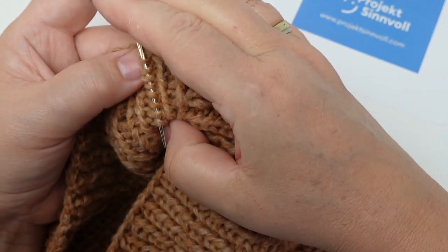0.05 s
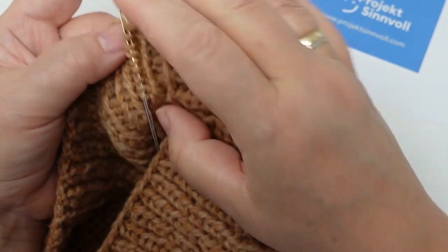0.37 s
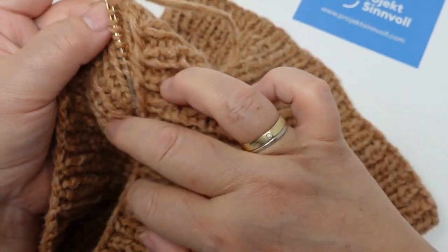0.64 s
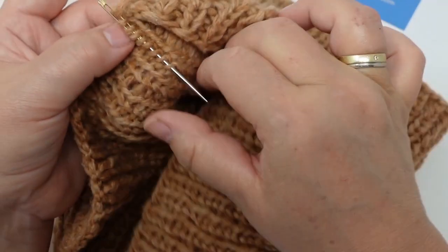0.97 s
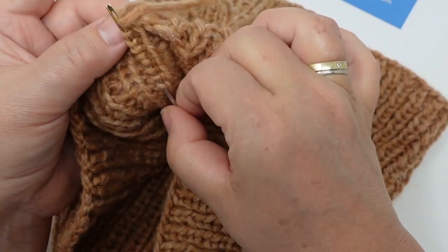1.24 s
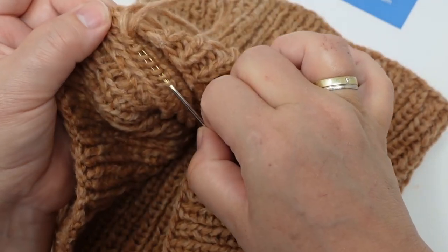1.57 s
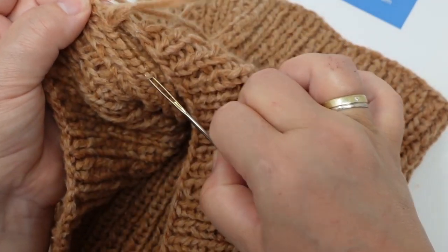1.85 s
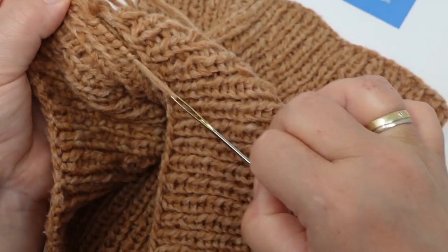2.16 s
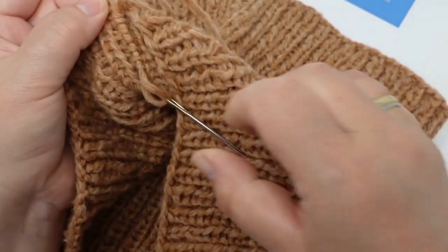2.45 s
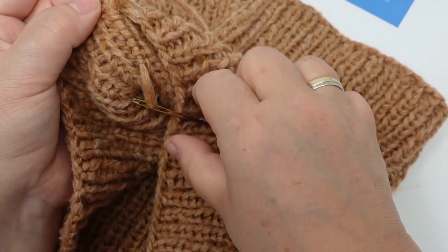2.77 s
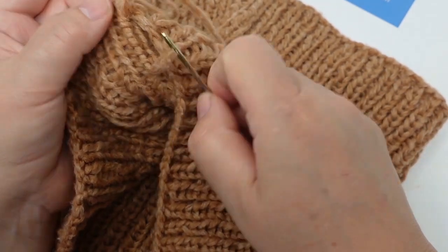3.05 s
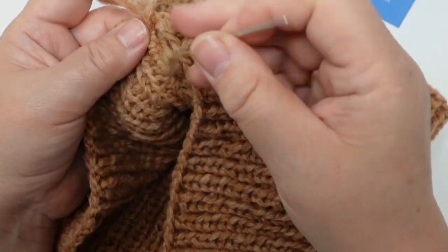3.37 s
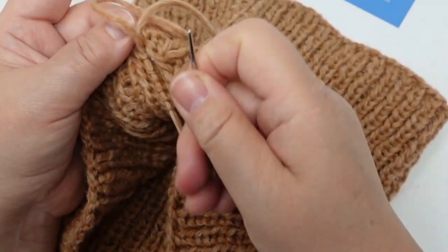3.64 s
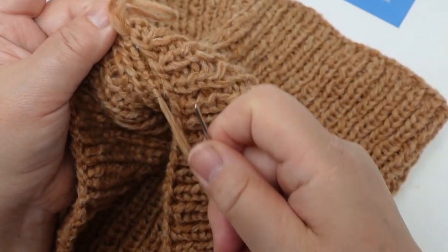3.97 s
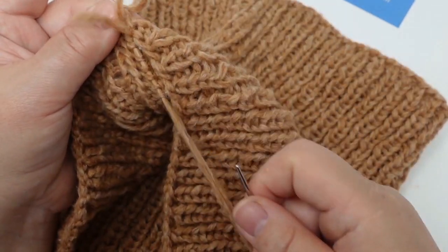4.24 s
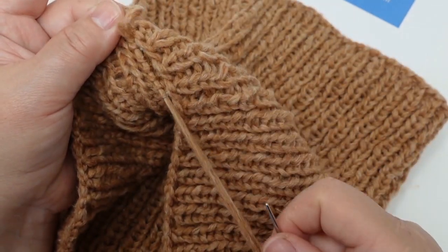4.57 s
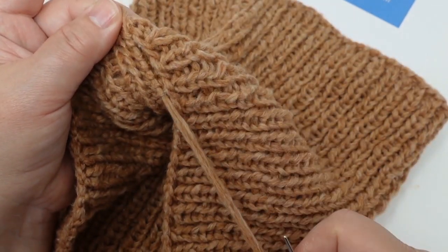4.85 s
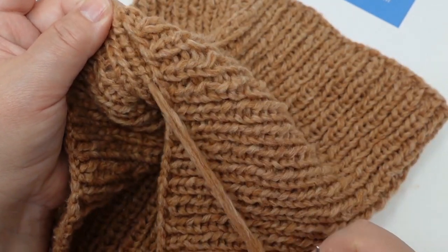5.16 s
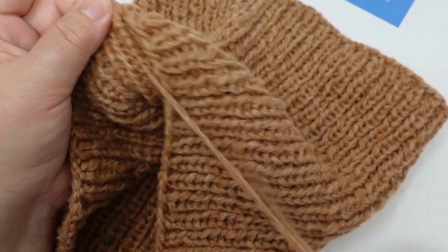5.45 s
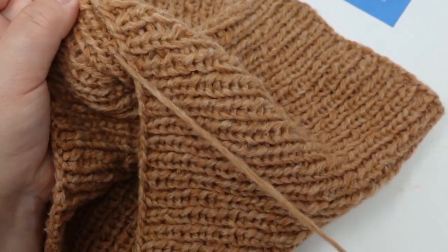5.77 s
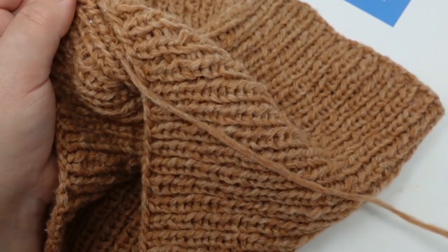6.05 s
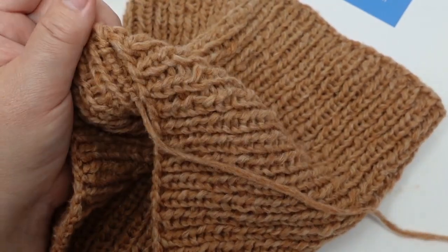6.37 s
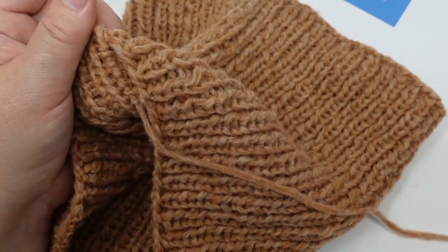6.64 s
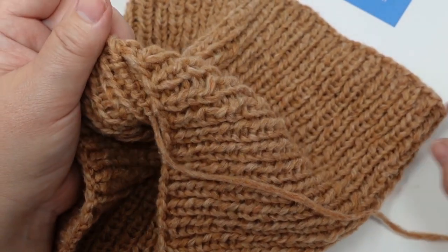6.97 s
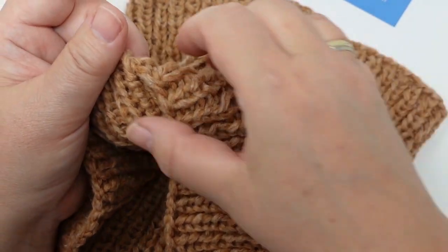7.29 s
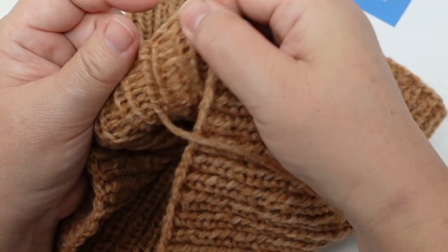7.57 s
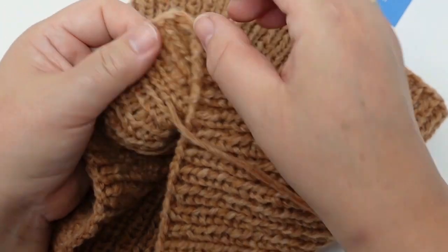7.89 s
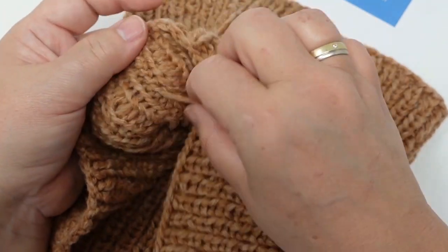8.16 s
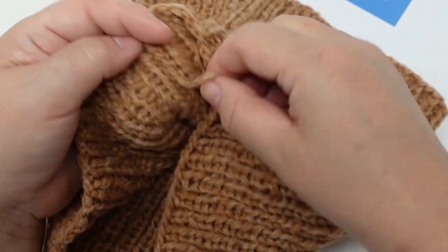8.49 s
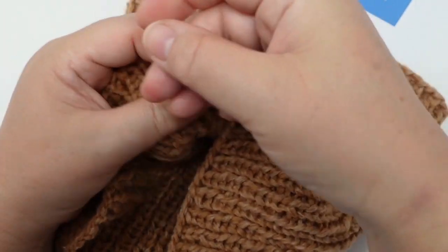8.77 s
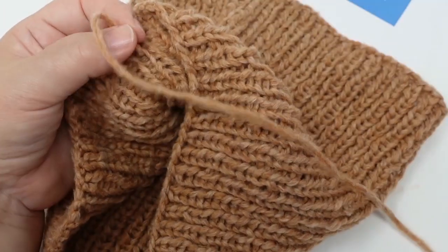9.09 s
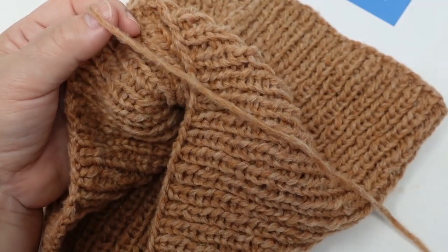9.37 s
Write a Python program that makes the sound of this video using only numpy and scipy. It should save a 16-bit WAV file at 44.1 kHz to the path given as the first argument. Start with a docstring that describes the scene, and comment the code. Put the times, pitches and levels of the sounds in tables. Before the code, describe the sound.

Wool is darned by hand, heard close in a small quiet room with a faint steady hiss. For the first 2.5 seconds fingers rub the knit in soft scratchy strokes, with very faint low gurgling blips around 0.5 to 1 second. The table clacks dryly at 1 second and louder at 2.5, followed by a small needle tick. From 3.6 to 5 seconds yarn is drawn through with a soft, fibrous hiss that dulls and fades. Two barely audible high squeaks come at 2 and 4.4 seconds. Around 6.4 a hand sweeps over the tabletop with light bumps, and the needle is set down with a sharp knock at 6.8. Rubbing resumes, with a clack at 7.3 and a weaker one at 8.8. At 9.2 the hand brushes and thumps the table, the loudest moment, followed by a few softer bumps until 9.6.

```python
"""Wool being darned by hand, close up: fingers rub the stitches and the yarn hisses as it is drawn
through, countless fibres slipping and snapping free, with small needle ticks. Now and then the joints
of the table underneath slip with a dry clack. The hand slides on the top, lays the needle down, and
later thumps softly to pick it up again. The room is small and quiet; early on come faint low gurgling
blips and a soft rough tone, then two thin high squeaks."""
import sys
import numpy as np
from scipy import signal
from scipy.fft import rfft, irfft, next_fast_len
from scipy.io import wavfile
from scipy.ndimage import uniform_filter1d

SR = 44100
rng = np.random.default_rng(int(sys.argv[2]) if len(sys.argv) > 2 else 0)


def wrap_up_sound(samples):
    """Save the sound to the file named by the first command line argument, as 16-bit audio."""
    columns = np.atleast_2d(samples).T
    # keep every value between -1 and 1, then stretch to whole-number steps
    tamed = np.clip(columns, -1, 1)
    steps = np.round(tamed * 32767).astype(np.int16)
    wavfile.write(sys.argv[1], SR, steps)


N = 424241

# blows on the table top: t/s, flesh thud/dB, nail or needle knock/dB, shudder of the whole top/dB
TABLE_BLOWS = [(6.362, -44.5, -66, -62), (6.396, -46, -51, -62), (6.457, -37, -47.5, -60),
               (6.478, -39, -49, -46), (6.51, -37, -71, -56), (6.528, -39, -71, -60),
               (6.658, -43, -47.5, -48), (6.8236, -48, -23, -35), (9.189, -27, -49, -40.5),
               (9.239, -18, -27, -23.5), (9.365, -25.5, -35.5, -36.5), (9.462, -37.5, -52.5, -46.5),
               (9.527, -28.5, -47, -42), (9.596, -43, -62, -65)]
# stereo image of the rubbing and of the hits: f/Hz, left-right likeness
RUB_IMAGE = [(200, 1), (1500, 0.48), (6000, 0.67), (14000, 0.79)]
HIT_IMAGE = [(200, 0.52), (2000, 0.53), (12000, 0.8)]


def wool():
    """Fibres drag through the stitches under grip, strokes and drawn yarn; quick moves are brighter."""
    # the knit shifting in the holding hand: t/s, level/dB
    grip = [(.2, -103), (.35, -71.5), (1.65, -65), (2.3, -64.5), (2.45, -75), (2.9, -78.5), (3.55, -69),
            (5.05, -88), (6.3, -77.5), (6.9, -75), (7.25, -76.5), (7.6, -68.5), (8.2, -73), (8.4, -65.5),
            (8.8, -70.5), (9.6, -69)]
    # the long draw of yarn: t/s, level/dB
    draw = [(3.57, -75), (3.64, -57), (3.73, -52.5), (3.85, -61), (3.92, -55), (4.28, -57), (4.36, -60),
            (4.56, -62.5), (4.77, -58.5), (4.85, -66), (5.02, -77)]
    # finger strokes: t/s, level/dB, half-length/s, treble lift/dB
    strokes = [(.41, -58, 0.065, 2.5), (.53, -60, 0.11, -5), (.68, -55, 0.014, 4), (.76, -61, .05, 0),
               (.85, -53, 0.034, 7.5), (.888, -47.5, 0.018, 7.5), (.97, -51.5, 0.064, 2),
               (1.06, -57.5, 0.079, -9), (1.53, -65, 0.044, -4), (1.78, -58.5, .055, -3),
               (1.99, -59, 0.071, 2.5), (2.12, -54, 0.032, 5.5), (2.27, -65, 0.018, 11),
               (2.36, -58, 0.02, 4), (3.04, -71, 0.035, 7), (3.29, -65.5, 0.025, 7), (3.42, -67, 0.029, 17),
               (5.16, -71.5, .025, 8), (5.45, -64.5, 0.031, -4), (5.56, -67.5, 0.059, -10),
               (5.92, -68, 0.046, -2), (7.5, -58, 0.058, 0.5), (7.8, -61, 0.014, 1), (8.1, -68, 0.085, 1),
               (8.49, -58.5, 0.033, 5), (8.67, -55.5, 0.017, 8.5)]
    # tone of the fibre hiss: f/Hz, level/dB
    spectrum = [(20, -70), (70, -35), (150, -36), (320, -21.5), (700, -9.5), (1200, -0.5), (1800, -2),
                (2600, 0), (4500, 2.5), (6400, 1), (8000, 1.5), (10500, -1.5), (15500, -6.5)]
    # resonances that colour the rubbing: f/Hz, width/Hz, lift/dB
    peaks = [(1870, 90, 6), (4050, 110, 5), (6040, 280, 6.5), (6550, 200, 8), (7270, 150, 3),
             (8300, 450, 2.5), (8880, 150, 3), (10340, 200, 3.5), (10820, 200, 3)]
    hinge_hz, treble_db = 9000, 4.5
    draw_db = curve(draw)
    draw_lift_db = 3.5 + 0.41 * (draw_db - draw_db.max())  # the yarn dulls as it slows
    moves = [(amp(curve(grip)), -2), (amp(draw_db), draw_lift_db)]
    moves += [(swell(s, db, half), lift_db) for s, db, half, lift_db in strokes]
    dull_power, bright_power = np.zeros((2, N))
    for level, lift_db in moves:
        tilt = amp(lift_db) ** 2
        power = 2 * level ** 2 / (1 + tilt)
        dull_power += power
        bright_power += power * tilt

    def resonances(hz):
        return amp(sum(db / (1 + (2 * (hz - centre) / width) ** 2) for centre, width, db in peaks))
    hiss = reflections(coloured(fibres(per_s=260, spread_db=7, snap_db=-9.5), spectrum, RUB_IMAGE))
    hiss = unit(filtered(hiss, resonances))
    treble = filtered(hiss, lambda hz: 1 / (1 + (hinge_hz / (hz + 1)) ** 6))
    rub = np.sqrt(dull_power) * (hiss - treble) + amp(treble_db) * np.sqrt(bright_power) * treble
    flutter = amp(-1.5 + 1.1 * wobble(45))
    return rub * flutter * amp([[.3], [-.3]])


def fibres(per_s, spread_db, snap_db):
    """Countless tiny slips merge into hiss; a few fibres snap free more loudly."""
    snapping = rng.random(N) < per_s / SR
    snaps = snapping * amp(spread_db * np.minimum(rng.exponential(size=N), 3))
    return white() + amp(snap_db) * unit(snaps * np.sign(white()))


def ticks():
    """Needle and snagging fibres tick brightly, one clack gets a sharp edge, and the nail grazes the top before
    each blow."""
    # lone ticks: needle ticks and snags, the sharp edge of the clack at 2.56 s, and the nail grazing the top
    # just before the blow at 6.658 s: t/s, level/dB
    lone_ticks = [(1.938, -55), (2.5642, -43.5), (5.424, -57), (5.452, -58), (6.651, -47), (7.109, -53.5),
                  (7.133, -57), (9.048, -55.5)]
    # tone of a tick: f/Hz, level/dB
    spectrum = [(20, -70), (120, -41), (400, -6.5), (1100, 2.5), (2400, -4), (4800, 4.5), (8000, -4.5),
                (15500, -16.5)]
    level, t = np.zeros(N), clock(SR // 3)
    for s, db in lone_ticks:
        add(level, s, amp(db) * fade(t, hold=0.00077, t60=0.086))
    for s, thud_db, knock_db, _ in TABLE_BLOWS:
        lead_s = .00028 * (-13 - thud_db)  # a softer, slower blow lands longer after the nail
        nail_db = thud_db - 8 + 0.69 * (knock_db - thud_db)
        add(level, s - lead_s, amp(nail_db) * fade(t, hold=0.001, t60=0.059))
    return level * coloured(white(), spectrum, RUB_IMAGE)


def blows():
    """Soft flesh moves the top's low modes, nail and needle its higher ones; knocks add contact noise."""
    # modes of the table top: f/Hz, level/dB, t60/s
    top = np.array([(120, -9, .11), (139, 0, .11), (172, -9, .08), (294, -20.5, .16), (497, -15, .11),
                    (580, -17, .1), (721, -19, .08), (793, -11, .07), (905, -1, .045), (968, 1, .055),
                    (1060, -1, .045), (1130, -4, .045), (1205, -4, .055), (1310, -8, .045),
                    (1470, -10, .045), (1640, -14, .04), (2200, -19, .06)])
    # tone of the shudder and of the hard contact: f/Hz, level/dB
    shudder_spectrum = [(20, -33), (60, -21), (160, -13), (280, 6.5), (420, 3), (580, 0.5), (900, -3.5),
                        (1400, -17.5), (1800, -36), (2200, -27), (3000, -25), (8000, -56)]
    contact_spectrum = [(20, -70), (100, -28), (600, 1), (1200, 5.5), (2400, 2.5), (5000, -5.5), (8000, -7),
                        (11000, -12.5), (15500, -32)]
    (modes, shudder, contact), t = np.zeros((3, N)), clock(SR // 3)
    low = top[:, 0] < 350
    for s, thud_db, knock_db, shudder_db in TABLE_BLOWS:
        thud = leveled(ring(top[low], t, cycles=1.5, scatter_db=1.5, scatter_phase=.4).sum(0))
        thud *= fade(t, hold=.02, t60=.18)  # the flesh settles and damps the swing
        knock = leveled(ring(top[~low], t, cycles=0.86, scatter_db=4.5, scatter_phase=2.78).sum(0))
        add(modes, s, amp(thud_db) * thud + amp(knock_db) * knock)
        # the many weaker modes blur into a noisy shudder
        add(shudder, s, amp(shudder_db) * fade(t, hold=0.0024, t60=0.16) * (1 - np.exp(-t / 0.004)))
        contact_db = -29.5 + 2.3 * (knock_db + 25)  # only hard knocks have much bite
        add(contact, s, amp(contact_db) * fade(t, hold=0.00071, t60=0.067))
    shudder_noise = coloured(white(), shudder_spectrum, image=[(300, .999), (2000, 0.56)])
    contact_noise = coloured(white(), contact_spectrum, HIT_IMAGE)
    return modes + shudder * shudder_noise + contact * contact_noise


def clacks():
    """A table joint gives way in a quick run of slips that ring it; harder slips are brighter."""
    # runs of slips: t/s, ring/dB, crack/dB, length/s, brightness/(dB per octave)
    slips = [(0.961, -35.5, -45.5, 0.0035, -5.5), (2.473, -28.5, -31.5, 0.013, 2),
             (2.503, -45, -48, 0.013, -5), (2.5625, -83, -53, .003, 14),
             (7.343, -35.5, -38.5, 0.0029, -3.5), (7.384, -51, -52, 0.0043, -12),
             (8.792, -44.5, -54.5, 0.0027, -5)]
    # modes of the joints: f/Hz, level/dB, t60/s
    joint = [(335, -10.5, .075), (395, -11, .07), (620, -15, .05), (790, -16, .06), (950, -14, .05),
             (1130, -13, .05), (1391, 0, .065), (1450, -6, .05), (1740, -8, .05), (1857, -4, .08),
             (1895, -4, .09), (2080, -8, .07), (3030, -16, .06), (3330, -15, .07), (4650, -14, .12),
             (4720, -14, .13), (5930, -21, .09)]
    # tone of the dry crack: f/Hz, level/dB
    spectrum = [(20, -72), (100, -45), (300, 8.5), (1000, 3.5), (1900, 11), (2600, 4), (4700, -0.5),
                (7000, -2.5), (9000, -9.5), (15500, -26)]
    body, crack, t = np.zeros(N), np.zeros(N), clock(SR // 3)
    hz, _, t60 = np.transpose(joint)[:, :, None]
    for s, ring_db, crack_db, length, bright_db in slips:
        sustain = amp(60 * np.minimum(t, length) / t60)  # no decay while the slipping lasts
        tilt = amp(bright_db * np.log2(hz))
        modes = ring(joint, t, cycles=2.1, scatter_db=2, scatter_phase=3.67, blur_hz=35.3)
        add(body, s, amp(ring_db) * leveled((modes * sustain * tilt).sum(0)))
        add(crack, s, amp(crack_db) * fade(t, length, t60=0.08))
    return (body + crack * coloured(white(), spectrum, HIT_IMAGE)) * amp([[.9], [-.9]])


def slides():
    """Skin and sleeve sweep over the smooth top, slow down and lift off."""
    # hand sweeps: t/s, length/s, level/dB, fade from slowing/(dB per s)
    sweeps = [(6.39, 0.055, -33, 0), (6.44, 0.061, -41.5, 22), (6.493, 0.13, -36.5, 103),
              (6.724, 0.08, -62.5, 0), (6.853, 0.072, -47.5, 0), (9.18, 0.052, -46, 0),
              (9.226, .085, -45, 55)]
    # tone of the brushing: f/Hz, level/dB
    spectrum = [(20, -60), (60, -16), (200, -4.5), (450, -22), (1000, -11.5), (1800, -10.5), (3000, -4.5),
                (5300, -1.5), (7000, -3.5), (10000, -6.5), (15500, -16)]
    attack_s, flutter_db = 0.031, 1.4
    level, t = np.zeros(N), clock(SR // 2)
    for s, length, db, slowing in sweeps:
        touch = np.minimum(t / attack_s, 1) * fade(t, length, t60=0.055)
        add(level, s, amp(db - slowing * t) * touch)
    hiss = reflections(coloured(fibres(per_s=3000, spread_db=13, snap_db=-21), spectrum, RUB_IMAGE))
    return level * amp(flutter_db * wobble(82)) * hiss * amp([[-.9], [.9]])


def blips_and_squeaks():
    """Faint low gurgling blips and a soft rough tone, then two thin high squeaks: jittering sines."""
    # brief tones: t/s, level/dB, f/Hz, half-length/s, pitch scatter as a share
    cues = [(.57, -62, 560, .025, .1), (.582, -60, 310, .02, .12), (.632, -55, 585, .011, .07),
            (.805, -61, 595, .03, .1), (1.08, -59, 355, .075, .11), (2.0, -74, 4250, .12, .03),
            (4.38, -70, 2740, .065, .02)]
    drift = np.cumsum(wobble(260)) / SR
    tones = sum(swell(s, db, half) * np.sin(2 * np.pi * hz * (clock(N) + scatter * drift))
                for s, db, hz, half, scatter in cues)
    return amp(0.8 * wobble(70)) * tones


def reflections(x):
    """The table, hands and other close surfaces comb the spectrum finely; returned at rms 1."""
    # first bounces: delay/s, gain
    bounces = [(.0011, 0.054), (.0023, -0.13), (.0037, -0.088), (.0059, .17), (.0083, -0.12)]
    combed = x.copy()
    for delay, gain in bounces:
        combed += gain * np.pad(x, ((0, 0), (round(delay * SR), 0)))[:, :N]
    return unit(combed)


def room(x):
    """The small room's short tail, different left and right, weak in the bass."""
    # decay of the room: f/Hz, t60/s
    decay = [(150, 1), (1000, 0.31), (5000, 0.54), (14000, 0.35)]
    hz, t, bands = signal.stft(rng.standard_normal((2, SR // 3)), SR, nperseg=256)
    tail = signal.istft(bands * amp(-60 * t / along(decay, hz)[:, None]), SR, nperseg=256)[1]
    tail = np.pad(tail / np.linalg.norm(tail[0]), ((0, 0), (SR // 200, 0)))  # 5 ms pre-delay
    send = filtered(x.mean(0), lambda hz: hz ** 3 / (hz ** 3 + 230 ** 3))
    return signal.fftconvolve(send[None], tail, axes=1)[:, :N]


def room_tone():
    """The still air of the room: a faint, wide, steady bed of noise."""
    # tone of the air: f/Hz, level/dB
    spectrum = [(18, -90), (30, -30.5), (161, -7.5), (251, -4), (294, 0.5), (509, -3.5), (612, -3.5),
                (680, -2), (735, -3.5), (955, -5), (1120, -6.5), (1240, -6.5), (1750, -4), (2390, -11.5),
                (15800, -21)]
    # its stereo image: f/Hz, left-right likeness
    image = [(60, 0.44), (240, 0.01), (950, 0.011), (3770, 0.017), (15000, 0.38)]
    return amp(-64) * coloured(white(), spectrum, image)


def ring(modes, t, cycles, scatter_db, scatter_phase, blur_hz=0):
    """One damped sine a mode, swelling over some of its own cycles; rattling contact blurs its pitch."""
    hz, db, t60 = np.transpose(modes)[:, :, None]
    phase = 2 * np.pi * hz * t + scatter_phase * rng.standard_normal(hz.shape)
    if blur_hz:
        wander = unit(uniform_filter1d(rng.standard_normal(phase.shape), size=SR // 150))
        phase += 2 * np.pi * blur_hz * np.cumsum(wander, axis=1) / SR
    attack = 1 - np.exp(-(hz * t / cycles) ** 2)
    decay = amp(db + scatter_db * rng.standard_normal(hz.shape) - 60 * t / t60)
    return attack * decay * np.sin(phase)


def coloured(pair, spectrum, image):
    """Two unrelated white signals become a stereo sound of rms 1 with this spectrum and image."""
    def response(hz):
        likeness = np.clip(along(image, hz), -1, 1)
        return amp(along(spectrum, hz)) * np.sqrt([1 + likeness, 1 - likeness])
    mid, side = filtered(pair, response)
    return unit(np.array([mid + side, mid - side]))


def filtered(x, response):
    """Equalise x by a gain that depends on frequency."""
    size = next_fast_len(N + SR // 20, real=True)
    gain = np.asarray(response(np.fft.rfftfreq(size, 1 / SR)), np.float32)
    return irfft(rfft(x.astype(np.float32), size) * gain, size)[..., :N]


def white():
    """Two unrelated white noises."""
    return rng.standard_normal((2, N), dtype=np.float32)


def wobble(rate):
    """A random curve, rate knots a second."""
    knots = rng.standard_normal(int(N * rate / SR) + 2)
    return np.interp(clock(N) * rate, np.arange(len(knots)), knots)


def swell(s, db, half):
    """A bell-shaped rise and fall of level around time s."""
    level, t = np.zeros(N), clock(round(8 * half * SR))
    add(level, max(s - 4 * half, 0), amp(db) * np.exp(-(t / half - 4) ** 2 / 2))
    return level


def fade(t, hold, t60):
    """Full level while a contact lasts, then an exponential decay; times in seconds."""
    return amp(-60 * np.maximum(t - hold, 0) / t60)


def curve(points):
    """(t/s, level/dB) points as one level a sample, silent before and after."""
    return np.interp(clock(N), *np.transpose(points), left=-120, right=-120)


def along(points, hz):
    """(f/Hz, value) points read on a log axis."""
    f, v = np.transpose(points)
    return np.interp(np.log(hz + 1), np.log(f + 1), v)


def leveled(x):
    """A hit scaled to rms 1 over its loudest hundredth of a second."""
    return x / np.sqrt(uniform_filter1d(x ** 2, size=SR // 100).max())


def unit(x):
    """x at rms 1."""
    return x / np.sqrt(np.mean(x ** 2) + 1e-20)


def amp(db):
    """Decibels to gain."""
    return np.exp(np.asarray(db) * (np.log(10) / 20))


def clock(size):
    """Seconds for each sample."""
    return np.arange(size) / SR


def add(track, s, x):
    """Mix x into the track from time s."""
    part = track[round(s * SR):][:len(x)]
    part += x[:len(part)]


def scene():
    """The close sounds with a little reverb, over the room tone."""
    hits = clacks() + blows() + ticks()
    textures = wool() + slides() + blips_and_squeaks()
    air = room_tone()
    reverb = room(amp(-11.5) * hits + amp(-12) * textures)
    return hits + textures + reverb + air


def record(dry):
    """A brick-wall high cut at 15.8 kHz."""
    return filtered(dry, lambda hz: hz < 15800)


dry = scene()
out = record(dry)
wrap_up_sound(out)
```